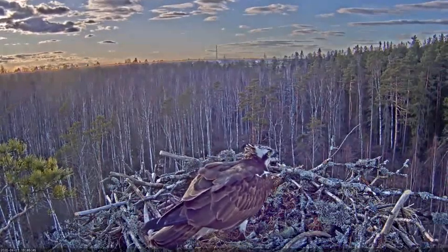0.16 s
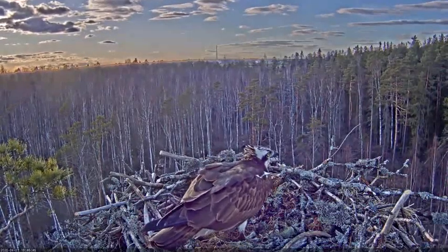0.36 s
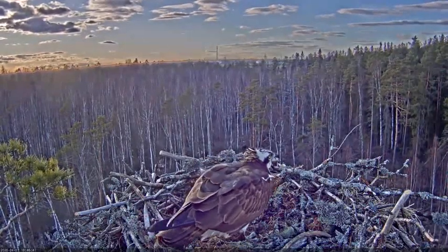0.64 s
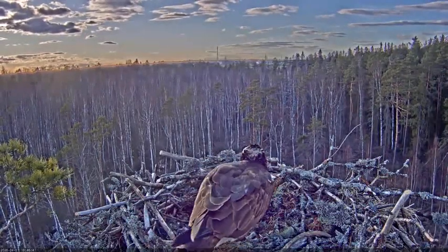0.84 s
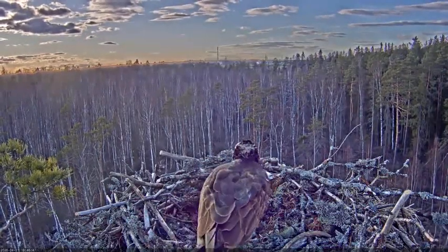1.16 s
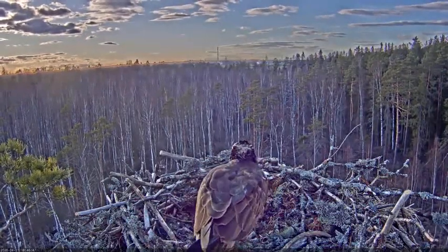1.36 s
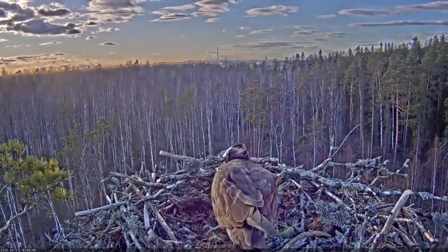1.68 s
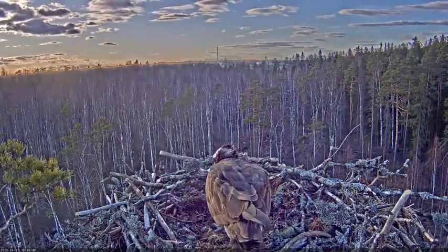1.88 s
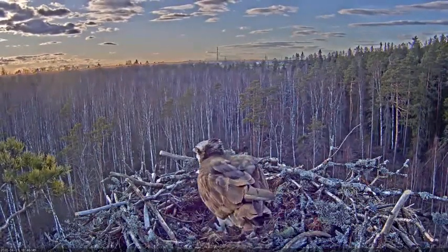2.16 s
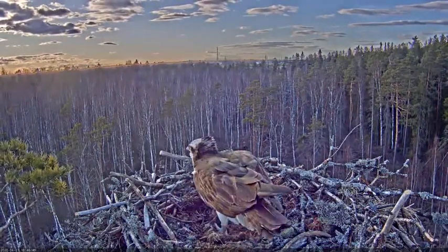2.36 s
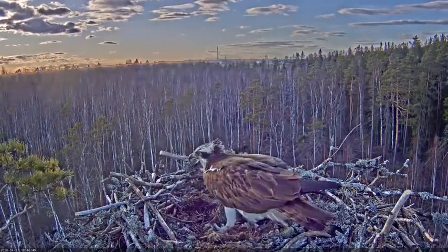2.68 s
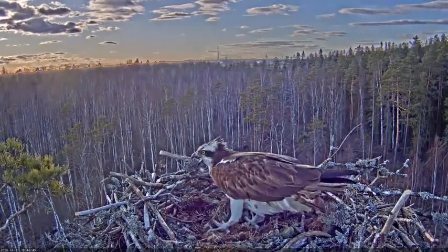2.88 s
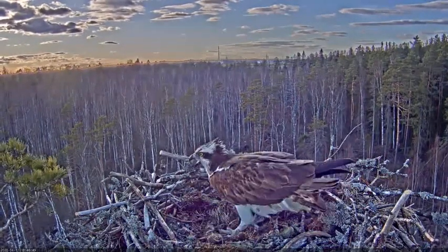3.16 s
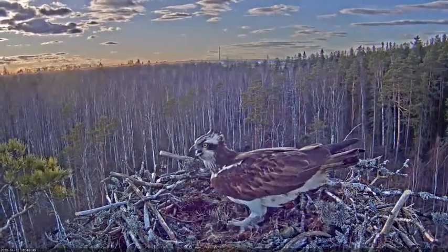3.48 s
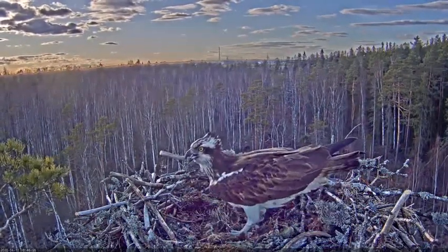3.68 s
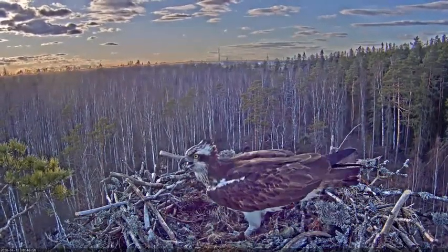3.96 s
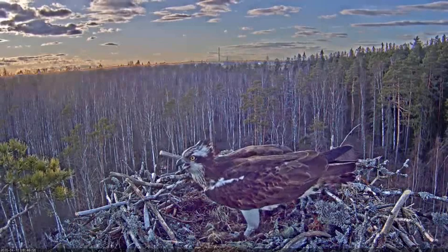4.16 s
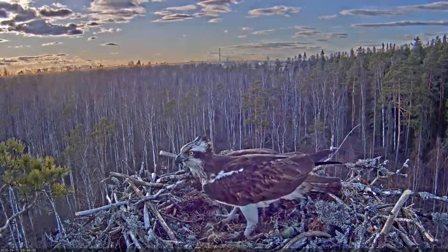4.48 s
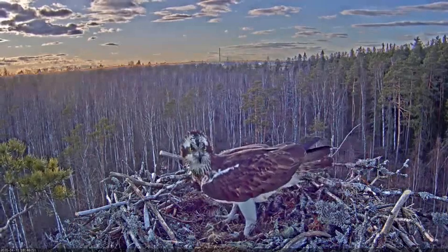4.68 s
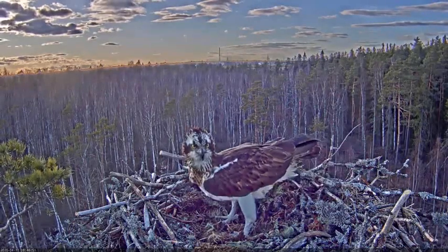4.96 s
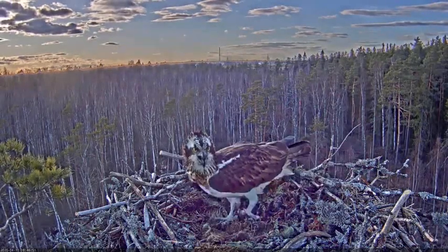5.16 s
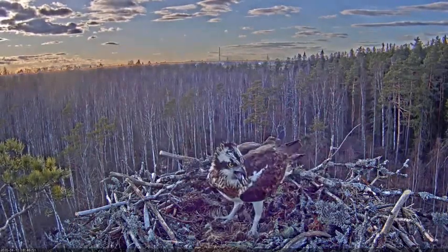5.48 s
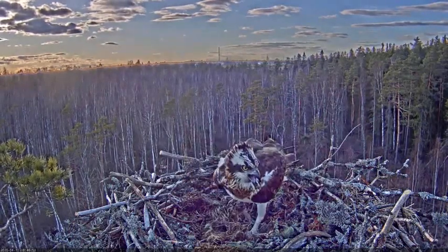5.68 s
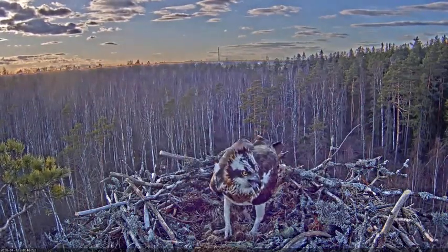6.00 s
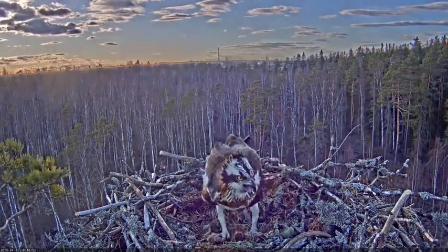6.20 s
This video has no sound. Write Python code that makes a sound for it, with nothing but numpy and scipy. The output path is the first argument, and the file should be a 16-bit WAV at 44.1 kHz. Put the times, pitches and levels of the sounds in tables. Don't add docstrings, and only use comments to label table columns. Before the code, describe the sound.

From the first instant a large bird of prey on a stick nest gives quick, high whistled chirps, about five a second, close to an outdoor microphone. Each is a short, nearly pure whistle that starts with a tiny throat click, leaps upward to a slightly raspy peak and drops back. The pitch edges higher until about 1.9 s; the calls around 2.0 to 2.6 s are a little more spaced and softer. From 3.3 to 4.4 s they become stronger and somewhat lower. A pause follows until about 5.15 s, with only wind and a faint forest echo. Then a lower, sagging note opens a final, loudest burst, slightly overloaded, running to the end at 6.3 s. Low wind buffeting swells around 1.3 to 3 s. Faint dry twig snaps, clearest near 1.85 and 2.5 s, and soft stick knocks and rustles lie beneath.

```python
import sys
import numpy as np
from scipy import signal
from scipy.fft import rfft, irfft
from scipy.io import wavfile
from scipy.ndimage import uniform_filter1d

SR = 44100
rng = np.random.default_rng(int(sys.argv[2]) if len(sys.argv) > 2 else 0)


def master_out(mix):
    frames = np.transpose(np.atleast_2d(mix))
    ceiling = np.clip(frames, -1, 1)
    pcm = np.round(ceiling * 32767).astype(np.int16)
    wavfile.write(sys.argv[1], SR, pcm)


def to_linear_factor(level_db):
    exponent = np.asarray(level_db, float) / 20
    return 10 ** exponent


N = 279153
INPUT_HZ = 32000
LEAD_S = 0.009

# start_s, crest_hz, first_db, last_db
TOP_NOTES = [(-0.03, 3476, -17, -19), (0.1856, 3394, -14.5, -20), (0.3737, 3470, -18.5, -17),
             (0.5727, 3600, -22.5, -20), (0.7712, 3690, -26.5, -18.5), (0.9768, 3858, -27, -24),
             (1.1928, 3692, -19, -14), (1.3918, 3673, -19, -17.5), (1.5869, 3754, -19.5, -23.5),
             (1.7864, 3814, -21.5, -21.5), (2.3028, 3410, -23, -19), (2.5405, 3420, -27.5, -28),
             (2.7483, 3565, -23, -23.5), (2.939, 3584, -21.5, -19.5), (3.139, 3547, -16.5, -20),
             (3.3713, 3371, -12, -16), (3.6512, 3183, -11.5, -15), (3.9116, 3204, -7.5, -16),
             (4.1231, 3354, -19, -18), (4.3446, 3338, -20, -14.5), (5.7784, 3603, -9, -11),
             (5.9924, 3604, -7.5, -9.5)]
# entry_above_line_percent, extra_end_sag_percent, extra_arch_db
TOP_BENDS = [(.1, 1, 1.3), (1.5, -2, 2.6), (2.5, 0, 1.9), (0, 1.5, -2.7), (4, 1, -0.1), (-2.5, 5.5, -4.5),
             (2.8, 0.5, 2), (0.9, 1, 1.5), (-1, -1, 1.5), (1, 0, 9), (0.9, -1, -1.5), (0, -2, -3.5),
             (-1, 0.6, -1.6), (1.2, -1, 0), (-.1, -0.5, -1.2), (-0.9, -1.4, 0.3), (0.6, 0.1, 3.2),
             (-0.2, -1, 3.7), (-0.5, 0.7, -1.5), (1.7, 0, -1), (-0.66, 0.6, -1), (-0.35, 1.9, 0.3)]
# start_s, length_s, from_hz, to_hz, level_db
DROPS_FROM_TOP = [(0.02, 0.011, 2666, 2420, -5.5), (0.245, 0.016, 2660, 2420, -10.5),
                  (0.4504, 0.016, 2724, 2404, -11), (0.655, 0.013, 2770, 2380, -8.5),
                  (0.8567, 0.012, 2900, 2730, -4), (1.0564, 0.021, 3054, 2660, -7),
                  (1.2539, 0.02, 2967, 2610, -7), (1.449, 0.024, 2970, 2510, -10),
                  (1.6443, 0.023, 3200, 2830, -10), (1.8446, 0.022, 3106, 2880, -8.5),
                  (2.3273, 0.022, 2786, 2400, -13), (2.5677, 0.024, 2836, 2430, -13.5),
                  (2.7712, 0.023, 2884, 2575, -10), (2.9832, 0.023, 2890, 2486, -8),
                  (3.185, 0.024, 2855, 2480, -8.5), (3.4032, 0.021, 2766, 2420, -7.5),
                  (3.6865, 0.013, 2520, 2290, -4.5), (3.9448, 0.017, 2580, 2280, -4.5),
                  (4.16, 0.018, 2660, 2377, -2.5), (4.3801, 0.017, 2640, 2350, -2.5),
                  (5.8205, 0.019, 2960, 2472, -3), (6.015, 0.028, 2900, 2543, -4.5)]
# start_s, length_s, from_hz, to_hz, level_db
SAGGING_NOTES = [
    (2.047, 0.036, 3235, 2740, -11.5),
    (5.235, 0.047, 2720, 2430, 0),
    (5.412, 0.045, 2977, 2660, -6),
    (5.61, 0.034, 2955, 2577, -3.5),
    (6.187, 0.041, 2982, 2620, 0),
]
# start_s, peak_db
THROAT_CLICKS = [(0.14, -29), (0.3417, -28.5), (0.543, -26), (0.7461, -25.5), (0.9504, -26.5),
                 (1.156, -23.5), (1.3546, -25.5), (1.553, -26), (1.7474, -31.5), (1.963, -30), (2.209, -38),
                 (2.456, -35), (2.674, -32.5), (2.88, -37), (3.0837, -34), (3.3023, -27), (3.5618, -32.5),
                 (3.8256, -31), (4.0547, -25), (4.2712, -24.5), (5.1432, -34), (5.353, -27),
                 (5.5392, -29.5), (5.725, -30.5), (5.9206, -26), (6.1197, -22.5), (6.317, -17)]
# start_s, from_hz, to_hz, first_db, last_db
OPENING_CLIMBS = [(0.1522, 2572, 2868, -13, -13), (0.3517, 2543, 2924, -16, -10.5),
                  (0.5488, 2600, 2925, -13.5, -10), (0.7553, 2630, 2900, -10, -22.5),
                  (2.2239, 2698, 2908, -23, -9), (2.4724, 2587, 2945, -18.5, -9),
                  (3.317, 2658, 2863, -11.5, -8.5), (3.5839, 2428, 2694, -14.5, -4.5),
                  (3.8463, 2433, 2744, -12, -2.5), (4.0648, 2461, 2818, -9.5, -0.5),
                  (4.2828, 2577, 2838, -16, -0.5), (5.1658, 2344, 2703, -14, -3)]
# start_s, from_hz, to_hz, first_db, last_db
LATER_CLIMBS = [(0.9678, 2990, 3120, -9.5, -10), (1.1743, 2956, 3060, -9.5, -18),
                (1.3729, 2900, 2992, -8, -14), (1.5719, 2933, 3057, -7, -10),
                (1.772, 3097, 3227, -11, -13.5), (1.989, 3005, 3215, -12.5, -30),
                (2.6954, 2713, 2967, -12.5, -11), (2.9039, 2838, 3006, -11.5, -23),
                (3.1064, 2753, 2978, -9, -10.5), (5.3768, 2690, 2992, -8, -6.5),
                (5.5659, 2900, 2981, -5, -1), (5.7469, 2887, 3020, -3.5, 0), (5.9455, 2861, 3072, -7, 0),
                (6.147, 2859, 2985, -3, -1)]
# start_s, length_s, level_db
LOW_TAILS = [(0.8745, 0.0052, -24), (1.082, 0.0031, -29), (1.2765, 0.0032, -28.5), (1.472, 0.01, -37.5),
             (1.6692, 0.0067, -23.5), (1.8705, 0.0058, -26), (2.089, 0.0048, -27), (2.793, 0.0045, -26.5),
             (3.005, 0.0058, -32), (3.208, 0.0058, -32), (5.4549, 0.0042, -15.5), (5.6416, 0.004, -19.5),
             (5.8388, 0.0041, -22.5), (6.0368, 0.0067, -19), (6.2316, 0.0052, -15)]
# start_s, last_pitch_hz, level_db, attack_s
LOW_LEADS = [(0.9518, 2413, -14.5, 0.016), (1.1594, 2374, -14, 0.0098), (1.3649, 2403, -14, 0.0044),
             (1.56, 2250, -14, 0.0084), (1.758, 2464, -10, 0.0088), (1.9745, 2414, -15.5, 0.011),
             (2.6814, 2188, -16, 0.0056), (2.8879, 2307, -15.5, 0.0033), (3.0915, 2284, -13, 0.0049),
             (5.3628, 2211, -8.5, 0.0069), (5.5474, 2290, -12, 0.0078), (5.7315, 2282, -7, 0.0075),
             (5.9285, 2250, -8.5, 0.0078), (6.1271, 2330, -8, 0.0068), (6.3231, 2335, -6.5, 0.0055)]
# top_rasp_db, octave_db as the head turns, lower_mode_hz, upper_mode_hz
CHIRP_VOICES = [(-22.5, 9.5, 2250, 2500), (-29.5, 8.5, 2130, 2500), (-25, 4, 2190, 3200),
                (-22.5, 8.5, 2250, 3200), (-22, 5.5, 2300, 3400), (-22, -1, 2450, 3300),
                (-24, 2, 2300, 3100), (-23, 4, 2320, 3600), (-28, -4, 2340, 3700), (-21.5, 2.5, 3000, 3400),
                (-39.5, -1.5, 2700, 2800), (-26.5, 3, 2200, 2780), (-24, 3, 2160, 2780),
                (-23.5, 4.5, 2260, 2890), (-21.5, 2, 2250, 2880), (-23.5, 0.5, 2250, 2860),
                (-21.5, 0.5, 2170, 2800), (-19.5, -0.5, 2050, 3000), (-22, 0, 2115, 3200),
                (-20, -2, 2170, 3600), (-20, -7.5, 2100, 2400), (-52, -2, 2115, 2730),
                (-23, 10.5, 2300, 2960), (-28, -2.5, 2300, 2500), (-17.5, 4.5, 2240, 2600),
                (-19.5, -2.5, 2235, 4100), (-22.5, 7.5, 2250, 2730), (-86, 2, 2300, 2900)]
# pitch_hz, width_hz, level_db
WINDPIPE_MODES = [(1490, 1200, -17), (2250, 130, 13.5), (1893, 66, -4), (2660, 560, 6), (2900, 230, 14),
                  (3440, 380, -11.5)]
# pitch_hz, level_db relative to the tone
OCTAVE_LEVELS = [(2300, -40.5), (2600, -31.5), (3000, -37.5), (3250, -31.5), (3450, -36.5), (3700, -29)]
# time_s, level_db
FOREST_SHARE = [(0, -40), (0.998, -37), (2.2, -36.5), (3.5, -47), (4.401, -50), (5.1, -50.5), (5.6, -49.5),
                (6.3, -50.5)]
# time_s, level_db
WIND_GUSTS = [(0, -37.5), (.5, -33), (1, -26), (1.351, -20.5), (1.65, -20.5), (2.1, -24), (2.6, -23.5),
              (3, -24.5), (3.601, -28), (4.199, -34), (4.6, -28.5), (4.95, -29), (5.8, -33.5),
              (6.201, -27.5)]
# pitch_hz, level_db per Hz
BUFFET_SPECTRUM = [(2.4, -47), (4.0, -1.5), (16, 1.5), (25, -4.5), (35, -9), (136, -35), (400, -55.5),
                   (520, -88), (880, -120)]
# pitch_hz, level_db per Hz
RUSH_SPECTRUM = [(100, -11), (400, -22.5), (800, -27), (1300, -33.5), (2000, -39), (4000, -52.5),
                 (15000, -53.5)]
# time_s, push, length_s
WIND_PUSHES = [
    (3.887, -0.033, .05),
    (4.098, -0.034, .05),
    (4.323, -0.069, .05),
    (5.22, -0.058, .05),
    (5.6, 0.037, 0.043),
    (5.75, -0.04, .03),
    (5.982, -0.091, .04),
    (6.173, 0.084, 0.065),
]
# start_s, peak_db
TWIG_SNAPS = [
    (.334, -52),
    (1.849, -38),
    (2.499, -31),
    (2.663, -50),
    (2.735, -46),
    (3.188, -37),
    (3.484, -44),
    (3.688, -39),
    (4.735, -54),
]
# start_s, level_db, pitch_hz, length_s,
# width_hz
NEST_KNOCKS = [
    (0.023, -56, 1200, 0.046, 248),
    (0.657, -51, 1180, 0.027, 205),
    (1.155, -47, 1460, 0.019, 2030),
    (1.289, -44.5, 1190, 0.037, 200),
    (1.737, -44, 1015, 0.058, 305),
    (2.219, -44, 920, 0.061, 196),
    (3.238, -46, 2760, 0.12, 1700),
    (3.45, -50.5, 3030, 0.06, 2215),
    (4.806, -55.5, 2200, 0.023, 259),
    (5.16, -33.5, 2900, 0.0058, 248),
]


def evened(x):
    return x / np.sqrt(np.mean(x ** 2) + 1e-20)


def add(mix, s, sound):
    part = mix[max(round(s * SR), 0):][:len(sound)]
    part += sound[:len(part)]


def resonate(x, hz, width):
    turn = np.exp(2j * np.pi * np.cumsum(hz * np.ones(len(x))) / SR)
    r = np.exp(-np.pi * width / SR)
    return 2 * (turn * signal.lfilter([1 - r], [1, -r], x / turn)).real


def resonate_twice(x, hz, width):
    return resonate(resonate(x, hz, width), hz, width)


def coloured(points):
    hz = np.fft.rfftfreq(N, 1 / SR)
    f, db = np.transpose(points)
    shape = to_linear_factor(np.interp(np.log(hz + 1), np.log(f + 1), db)) * (hz > 1)
    return evened(irfft(rfft(rng.standard_normal(N)) * shape, N))


def wobble(count, smooth_s):
    size = max(round(smooth_s * SR), 1)
    return evened(uniform_filter1d(uniform_filter1d(rng.standard_normal(count), size), size))


def near(gap_s, span_s):
    return np.clip(1 - gap_s / span_s, 0, 1)


def top_note(row, t, gone, left, middle):
    _, crest_hz, first_db, last_db, entry, sag, arch_db = row
    u = gone / gone[-1]
    hz = crest_hz - 1200 * np.maximum(middle - t, 0)
    hz -= (157 + crest_hz * sag / 100) * near(left, 0.03) ** 2
    hz += crest_hz * entry / 100 * near(gone, 0.025) ** 2
    swell_db = 75 * gone[-1] * abs(np.sin(np.pi * u)) ** 0.21
    return hz, first_db + (last_db - first_db) * u + swell_db - arch_db * (1 - 2 * u) ** 2


def fall_note(row, gone, before, after):
    _, length, from_hz, to_hz, level_db = row
    jumped = before[0] == "top"
    u = np.minimum(gone / length, 1)
    left = np.maximum(length - gone, 0)
    hz = from_hz + (to_hz - from_hz) * u ** (1 if jumped else 1.9)
    if not jumped:
        db = level_db - 7 * u ** 2 + (before[1][4] - level_db) * near(gone, 0.0061)
    elif after:
        db = level_db - 8 * near(gone, 0.0069) ** 2
    else:
        db = level_db - 4.5 * near(gone, 0.0039) ** 2
    release_db = -19
    if after:
        tail_db = after[1][2]
        release_db = tail_db + 0.95 * (tail_db + 23) - db[-1]
    return hz, db + release_db * near(left, 0.016) ** 2.6


def click(low):
    t = np.arange(400) / SR
    hz = 2250 - 700 * np.exp(-t / 0.0007)
    ring = (np.exp(-t / 0.0016) + 0.25 * np.exp(-t / 0.004)) * (1 - np.exp(-t / 0.0002))
    puff = 3 * np.sin(np.pi * t / 0.0006) * (t / 0.00034) * np.exp(-t / 0.00037)
    ring_db, puff_db = (-6, -1.5) if low else (-1.5, -9.5)
    breath = np.exp(-t / 0.0044) * evened(resonate(rng.standard_normal(len(t)), 3200, 1400))
    tone = ring * np.sin(2 * np.pi * np.cumsum(hz) / SR)
    return to_linear_factor(ring_db) * tone + to_linear_factor(puff_db) * puff + to_linear_factor(-22.5) * breath


def climb_note(row, gone, left, before, after):
    _, from_hz, to_hz, first_db, last_db = row
    u = gone / gone[-1]
    jumps = after[0] == "top"
    leaving = jumps * near(left, 0.0056)
    hz = from_hz + (to_hz - from_hz) * (u if jumps else np.sin(u * np.pi / 2)) + 49 * leaving
    start_share = np.exp(-gone / 0.016) if first_db < last_db else 1 - u ** 4
    db = last_db + (first_db - last_db) * start_share + 0.72 * (after[1][2] - last_db) * leaving
    if before[0]:
        return hz, db - 4.5 * near(gone, 0.012) ** 2
    return hz, db - 16.5 * near(gone, 0.004)


def tail_note(row, gone):
    u = gone / gone[-1]
    return 2300 + (1934 - 2300) * u, row[2] - 5 * u


def lead_note(row, gone, left):
    _, last_hz, level_db, attack_s = row
    hz = 2070 + (last_hz - 2070) * (gone / gone[-1]) ** 1.3
    return hz, level_db - 21 * near(gone, attack_s) ** 1.2 - 5.5 * near(left, 0.0068)


def note(kind, row, end, before, after, middle):
    t = np.linspace(row[0], end, num=24)
    gone, left = t - t[0], end - t
    if kind == "top":
        hz, db = top_note(row, t, gone, left, middle)
    elif kind == "fall":
        hz, db = fall_note(row, gone, before, after)
    elif kind == "climb":
        hz, db = climb_note(row, gone, left, before, after)
    elif kind == "tail":
        hz, db = tail_note(row, gone)
    else:
        hz, db = lead_note(row, gone, left)
    return np.c_[t, hz, db, np.full(len(t), kind in ("lead", "tail"))]


def song():
    tops = [a + b for a, b in zip(TOP_NOTES, TOP_BENDS)]
    parts = {"lead": LOW_LEADS, "climb": OPENING_CLIMBS + LATER_CLIMBS, "top": tops,
             "fall": DROPS_FROM_TOP + SAGGING_NOTES, "tail": LOW_TAILS}
    order, chirps = list(parts), []
    every_note = [(kind, row) for kind in parts for row in parts[kind]]
    for kind, row in sorted(every_note, key=lambda n: n[1][0]):
        if not chirps or order.index(kind) <= order.index(chirps[-1][-1][0]):
            chirps.append([])
        chirps[-1].append((kind, row))
    for notes in chirps:
        kind, row = notes[-1]
        ends = [r[0] - 0.0005 for k, r in notes[1:]]
        ends.append(row[0] + (LEAD_S if kind == "lead" else row[1]))
        middle = (notes[0][1][0] + ends[-1]) / 2
        befores, afters = [(None, None)] + notes, notes[1:] + [None]
        yield np.vstack([note(k, r, end, before, after, middle)
                         for (k, r), end, before, after in zip(notes, ends, befores, afters)])


def windpipe_air(hz, pipe_hz, upper_hz):
    run_in = 400
    count = len(hz) + run_in
    air = rng.standard_normal(count) * to_linear_factor(2.9 * wobble(count, 0.013))
    lean = 1 + 0.2 * (uniform_filter1d(hz, size=1300) / hz.max() - 0.95)
    lean = np.pad(lean, (run_in, 0), mode="edge")
    rung = np.zeros(count)
    for f, width, db in WINDPIPE_MODES:
        mode_hz = f * lean * np.interp(f, [2250, 2900], [pipe_hz / 2250, upper_hz / 2900])
        rung += to_linear_factor(db - 8 * (f > hz.max())) * resonate_twice(air, mode_hz, width)
    return evened(signal.lfilter(*signal.butter(6, hz.max() + 200, fs=SR), rung)[run_in:])


def chirp(rows, rasp_db, octave_db, pipe_hz, upper_hz):
    s, hz, db, low = np.transpose(rows)
    t = np.arange(s[0] - 0.003, s[-1] + 0.0072, 1 / SR)
    t = t[t >= 0]
    hz, low = uniform_filter1d(np.interp(t, s, hz), size=24), np.interp(t, s, low)
    since_start = t - s[0] + 0.003 + (s[0] < 1 / SR)
    fade = np.clip(np.minimum(since_start, s[-1] + 0.004 - t) / 0.004, 0, 1)
    level = np.sqrt(2) * to_linear_factor(uniform_filter1d(np.interp(t, s, db), size=60)) * fade
    jump = uniform_filter1d(1.0 * (abs(np.gradient(hz)) > 8), size=70)
    falter = np.where(hz.min() + 900 * low.max() + 300 > hz, 3.0, 0.9) * jump
    level *= 1 - uniform_filter1d(np.minimum(falter, 0.9), size=40)
    top = uniform_filter1d(1.0 * (hz > hz.max() - 330), size=200)
    rasp = to_linear_factor(rasp_db - 1.0) * (top + 0.39 * (1 - top) * (hz > 2750))
    rasp = rasp * np.minimum(level / level.max() * 6, 1) + to_linear_factor(-30.0) * level
    strain = 0.4 * np.clip((hz - 3790) / 60, 0, 1)
    shake = 0.3 * np.minimum(rasp / (level + 1e-5), 1) + 1.9 * strain
    shaken_hz = hz * (1 + (0.0019 + 0.013 * shake) * wobble(len(t), 0.00079))
    phase = 2 * np.pi * np.cumsum(shaken_hz) / SR
    half = to_linear_factor(-49.0 + 80 * strain + 0.87 * wobble(len(t), 0.036)) * np.sin(phase / 2)
    tone = level * (1 + (0.008 + 0.25 * shake) * wobble(len(t), 0.001)) * (np.sin(phase) + half)
    flow = tone + rasp * windpipe_air(hz, pipe_hz, upper_hz)
    square_db = np.where(low > 0.5, -15.5, np.interp(hz, *np.transpose(OCTAVE_LEVELS)) + octave_db)
    square_db = square_db + 0.9 * (db.max() + 2.0)
    square = 2 * (tone + to_linear_factor(-7) * (flow - tone)) ** 2 / (level + rasp + 1e-5) * to_linear_factor(square_db)
    square = signal.lfilter(*signal.butter(2, 700, "high", fs=SR), square)
    cube = to_linear_factor(-52.0) * 4 * flow ** 3 / (level + rasp + 1e-5) ** 2
    beak_hiss = evened(resonate_twice(rng.standard_normal(len(t)), 5500, 480))
    return t[0], flow + cube + to_linear_factor(-31.5) * rasp * beak_hiss + square


def bird():
    out = np.zeros(N)
    for rows, voice in zip(song(), CHIRP_VOICES):
        add(out, *chirp(rows, *voice))
    for s, db in THROAT_CLICKS:
        low_start = any(0 < row[0] - s < LEAD_S * 2 for row in LOW_LEADS)
        add(out, s, click(low_start and s < 3.5) * to_linear_factor(db))
    return out


def forest(x):
    t60_s, edge_s, edge_spread_s = 1.6, 0.124, 0.004
    count, lead = 2 * SR, round(SR * 4 / 5)
    t = np.arange(count) / SR
    taps = rng.choice([-1.0, 1.0], count) * (rng.random(count) < 1500 / SR)
    arrival = 0.11 + (t > edge_s) * (3.3 + 9 * np.exp(-np.abs(t - edge_s) / edge_spread_s))
    taps *= to_linear_factor(-60 * t / t60_s) * arrival * to_linear_factor(2.5 * wobble(count, 0.02))
    middle_band = signal.lfilter(*signal.butter(2, [2000, 3950], "band", fs=SR), taps)
    taps = middle_band + 0.7 * signal.lfilter(*signal.butter(2, 3800, fs=SR), taps)
    earlier = np.r_[x[:lead], x]
    return signal.fftconvolve(earlier, taps / np.linalg.norm(taps))[lead:lead + N]


def wind():
    t = np.arange(N) / SR
    gust_db = np.interp(t, *np.transpose(WIND_GUSTS))
    buffet = to_linear_factor(7.5 + gust_db + 2.7 * wobble(N, 0.059)) * coloured(BUFFET_SPECTRUM)
    lumps = sum(push * np.exp(-((t - at) / length) ** 2) for at, push, length in WIND_PUSHES)
    rush = to_linear_factor(-27.0 + 0.61 * gust_db) * coloured(RUSH_SPECTRUM)
    return lumps + 0.3 * np.tanh(buffet / 0.24) + rush


def nest():
    out, t = np.zeros(N), np.arange(260) / SR
    for s, db in TWIG_SNAPS:
        snap = rng.standard_normal(len(t)) * np.exp(-t / 0.0018)
        add(out, s, to_linear_factor(db) * signal.lfilter([1], [1, -0.8], snap))
    for s, db, hz, length, width in NEST_KNOCKS:
        count = round(length * SR)
        burst = rng.standard_normal(count) * np.hanning(count)
        add(out, s, to_linear_factor(db) * evened(resonate_twice(burst, hz, width)))
    return out


def scene():
    air = wind()
    voice = to_linear_factor(0.91) * bird()
    share_db = np.interp(np.arange(N) / SR, *np.transpose(FOREST_SHARE))
    return (voice + forest(voice * to_linear_factor(share_db)) + nest() + air)[None]


def camera_smear(x):
    size, group = 1536, 8
    hz, _, z = signal.stft(x, INPUT_HZ, nperseg=size, noverlap=size // 2)
    tilt_db = -1.6 * hz / 1000
    share = to_linear_factor(np.interp(hz, [3900, 4600], [-38, -13])) ** 2 * (hz > 600)
    power = abs(z) ** 2 * share[:, None]
    loud = (abs(z[:, hz > 1500]) ** 2).sum(1, keepdims=True)
    veil = to_linear_factor(-59 + tilt_db)[:, None] ** 2 * loud * (hz > 900)[:, None]
    noise_power = uniform_filter1d(power, size=60, axis=1) + veil
    uneven = rng.standard_normal((len(hz) // group + 1, z.shape[2] // 2 + 1))
    uneven = to_linear_factor(4.0 * np.kron(uneven, np.ones((group, 2))))[:len(hz), :z.shape[2]]
    z = z + np.sqrt(abs(noise_power)) * uneven * np.exp(2j * np.pi * rng.random(z.shape))
    sums = np.add.reduceat(abs(z) ** 2, np.arange(0, len(hz), group), axis=1)
    mean = np.repeat(sums, group, axis=1)[:, :len(hz)] / group
    weak = mean * uneven ** 2 < to_linear_factor(-58 + tilt_db)[:, None] ** 2 * loud
    z = z * np.where(weak & (hz > 4000)[:, None], 0.05, 1)
    return signal.istft(z, nperseg=size, noverlap=size // 2)[1][:, :x.shape[1]]


def band_limit(x):
    return signal.sosfilt(signal.butter(12, 15250, fs=SR, output="sos"), x)


def record(dry):
    hard, ceiling, offset = 36.0, 0.86, 0.052
    run_on = 4410
    count = N + run_on
    longer = np.pad(dry, ((0, 0), (0, run_on)), mode="reflect", reflect_type="odd")
    longer = longer * np.minimum((count - np.arange(count)) / run_on, 1)
    slow = signal.resample(longer, round(count * INPUT_HZ / SR), axis=1) + offset
    clipped = slow / (1 + abs(slow / ceiling) ** hard) ** (1 / hard)
    back = signal.resample(camera_smear(clipped), count, axis=1)
    hz = np.fft.rfftfreq(count, 1 / SR)
    shelf = np.interp(hz, [13900, 14200, 15100, 15250], to_linear_factor([0, -12, -14, -80]))
    mix = irfft(rfft(back) * shelf, count)[:, :N]
    return band_limit(mix)


dry = scene()
out = record(dry)
master_out(out)
```